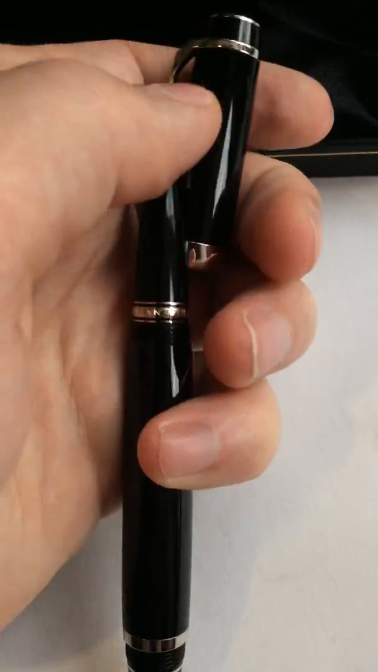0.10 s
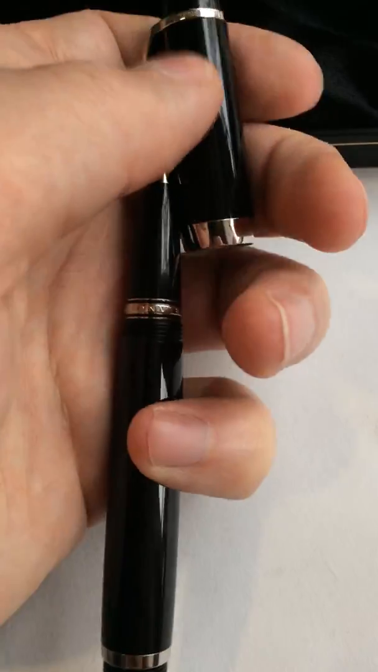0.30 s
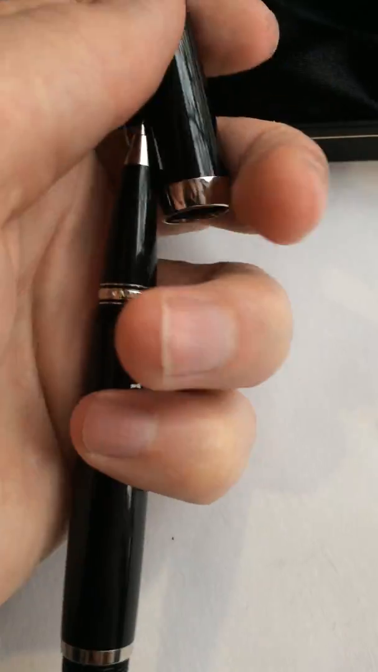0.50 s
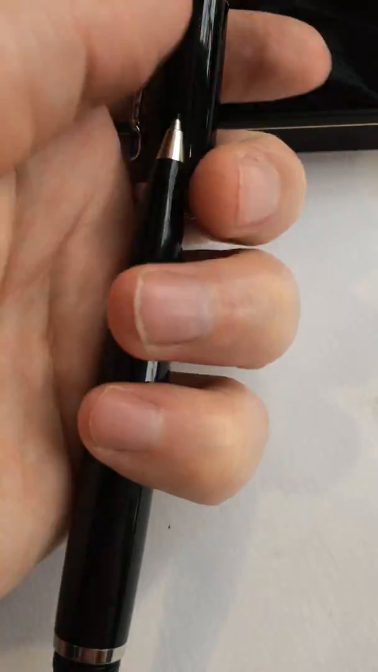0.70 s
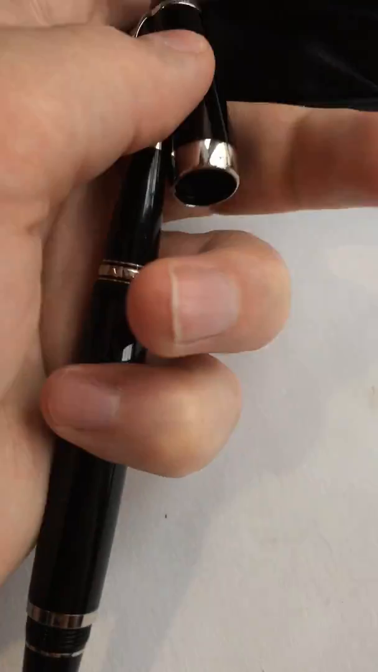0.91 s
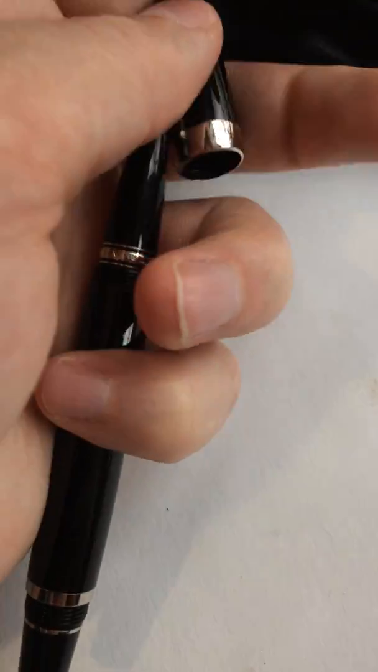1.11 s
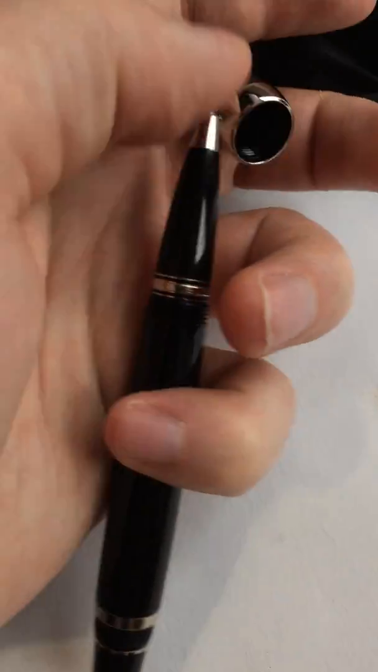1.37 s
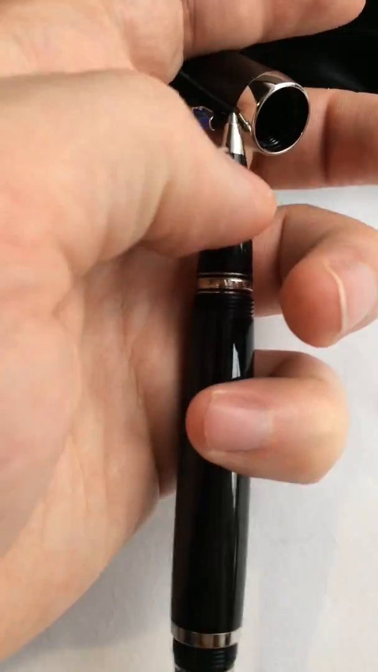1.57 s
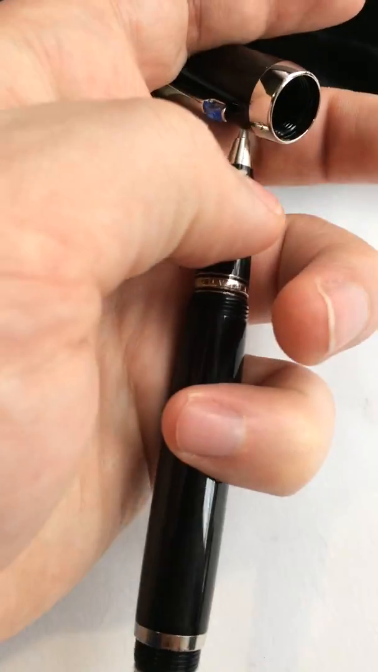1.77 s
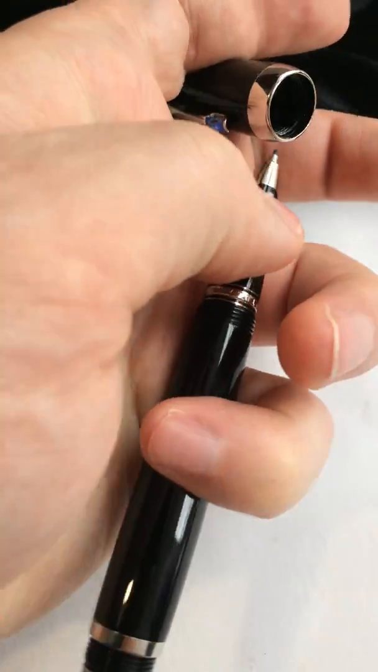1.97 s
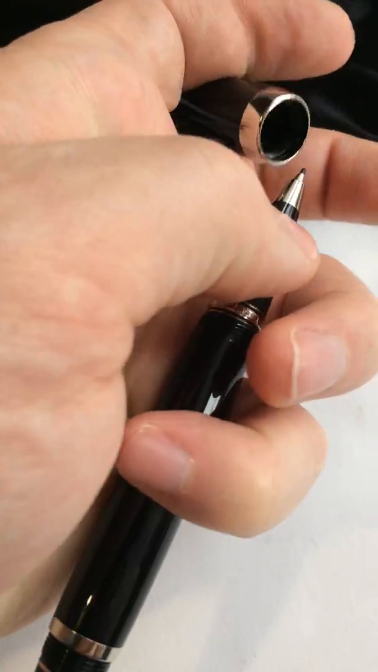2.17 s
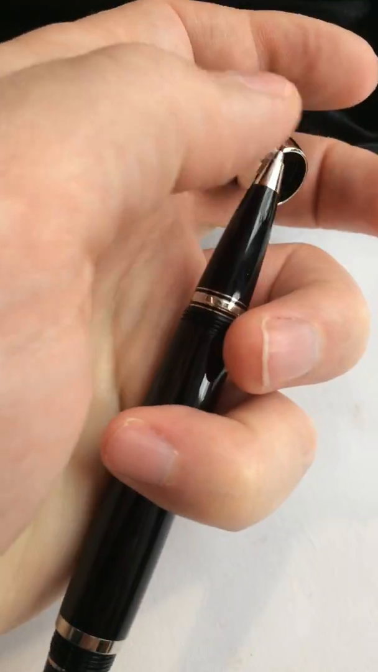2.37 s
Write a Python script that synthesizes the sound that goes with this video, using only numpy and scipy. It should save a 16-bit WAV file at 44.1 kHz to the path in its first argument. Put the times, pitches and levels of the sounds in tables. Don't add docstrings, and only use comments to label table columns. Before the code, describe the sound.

Hard little pen parts click together in hands, one sharp rattle then sparse ticks over faint hum

```python
import sys
import numpy as np
from scipy import signal
from scipy.fft import rfft, irfft
from scipy.io import wavfile

SR = 44100
rng = np.random.default_rng(int(sys.argv[2]) if len(sys.argv) > 2 else 0)


def to_wav(sig):
    pcm = np.clip(np.atleast_2d(sig), -1, 1) * 32767
    pcm = np.round(pcm).astype(np.int16)
    wavfile.write(sys.argv[1], SR, pcm.T)


def invert_db(level):
    return 10 ** (np.asarray(level, dtype=float) / 20)


N = 110250


def delayed(x, late_s):
    return np.roll(x, int(round(late_s * SR)))


def rms_one(x):
    return x / np.sqrt(np.mean(x ** 2) + 1e-30)


def filtered(x, order, edge_hz, kind):
    return signal.sosfilt(signal.butter(order, edge_hz, kind, fs=SR, output="sos"), x)


def ring(clicks, pitch_hz, t60_s):
    decay = invert_db(-60 / (t60_s * SR))
    turn = 2 * np.pi * pitch_hz / SR
    return signal.lfilter([0, np.sin(turn)], [1, -2 * decay * np.cos(turn), decay * decay], clicks + 1e-18)


# (softer contacts narrow around 4 kHz, losing dB per octave away from 4 kHz per dB softer)
HOLDS = [
    (.00053, -4.5, -13, .3),
    (.00056, -1, -14, 0),
    (.00055, -5, -16, 0),
    (.0005, -6, -11, 0),
    (.00048, -2, -21, 0),
]


def strikes(hits, modes, hold):
    start_s, level_db, tilt_db = np.transpose(hits)
    palm_delay_s, palm_level_db, crack_level_db, softening = HOLDS[hold]
    at = (start_s * SR).astype(int)
    softer_db = level_db.max() - level_db
    out = np.zeros(N)

    for k, (pitch_hz, mode_db, t60_s) in enumerate(modes):
        octaves = np.log2(pitch_hz / 4000)
        click_db = level_db + mode_db - 8 + tilt_db * octaves - softening * softer_db * abs(octaves)
        clicks = np.zeros(N)
        clicks[at] = invert_db(click_db) * (-1) ** k
        out += ring(clicks, pitch_hz, min(t60_s, 105 / pitch_hz))

    t = np.arange(600) / SR
    crack_t60_s = .005
    cracks = rng.standard_normal((len(at), len(t)))
    crack_db = level_db + crack_level_db - softening * softer_db
    for i, db, crack in zip(at, crack_db, cracks):
        out[i:i + len(t)] += invert_db(db - 60 * t / crack_t60_s) * crack
    return out + invert_db(palm_level_db) * delayed(out, palm_delay_s)


# start_s, level_db, tilt_db_per_octave
CHATTER = [
    (.2002, -15, 0),
    (.2084, -21.5, -.5),
    (.2126, -28.5, 1),
    (.2154, -29, -1),
    (.2176, -31, -1),
    (.2197, -36, -1),
    (.2215, -39, -2),
    (.2322, -54, -3),
]
# pitch_hz, level_db, t60_s
CAP_MODES = [(1740, -13, .011), (2392, -20, 0.053), (3320, -4, 0.02206), (4040, 5, 0.0068),
             (4700, 1.5, 0.0083), (5380, -1.5, 0.0047), (6640, -1, 0.014), (7350, -12, .008),
             (7790, -4.5, .016), (8700, -9.5, 0.012), (9740, 1.5, 0.0072), (10664, 4.5, .009),
             (13220, -7, .006), (15000, -11.5, .004)]


def cap_chatter():
    return strikes(CHATTER, CAP_MODES, 0)


# start_s, level_db, tilt_db_per_octave
BAND_TAPS = [
    (.3422, -29, 0),
    (.3446, -42, -4),
]
# pitch_hz, level_db, t60_s
BAND_MODES = [(1430, -20, 0.0099), (1952, -15, 0.029), (2440, -8, 0.015), (2970, -4.5, 0.0066),
              (3610, -8, 0.015), (4700, -2.5, 0.011), (6000, -2, 0.016), (6500, -5.5, 0.012),
              (7770, 7, 0.022), (8140, 9.5, 0.0078), (9300, 9.5, 0.0037), (11500, 2.5, 0.0031),
              (11900, -4, 0.0073), (14340, -8, 0.0065)]


def band_taps():
    return strikes(BAND_TAPS, BAND_MODES, 1)


# start_s, level_db, tilt_db_per_octave
MOUTH_KNOCKS = [
    (.7614, -56.5, -3),
    (1.6725, -35, 0.6),
    (1.6770, -38.5, 1),
    (1.6813, -48, 0),
    (1.8498, -70, 7),
]
# pitch_hz, level_db, t60_s
MOUTH_MODES = [(1310, -26, 0.01), (1680, -1.5, 0.024), (2570, -11.5, 0.0076), (3195, 1.5, 0.03),
               (4074, 0.5, 0.0093), (6500, -24, 0.014), (7480, 6, 0.02), (7840, 4.5, 0.0043),
               (9750, -13, 0.0091), (10850, -5, 0.01), (11500, 5, 0.0049), (14650, -10, 0.013)]


def mouth_knocks():
    return strikes(MOUTH_KNOCKS, MOUTH_MODES, 4)


# start_s, level_db, tilt_db_per_octave
TOUCHES = [
    (.2853, -63, 9.5),
    (.4358, -43.5, 3.6),
    (.6696, -65.5, 1),
    (.7464, -61.5, -10.5),
    (.8726, -66, 5),
    (1.1382, -59, -5.0),
    (1.8041, -57.5, -11),
]
# pitch_hz, level_db, t60_s
TOUCH_MODES = [(1400, -25.5, .008), (2730, 1, 0.014), (3330, -5.5, 0.027), (4000, -2, .014),
               (6940, 2, 0.0033), (7860, 3.5, 0.018), (8480, 2, 0.0088), (9850, -4, 0.0054),
               (13500, -11, 0.006)]


def light_touches():
    return strikes(TOUCHES, TOUCH_MODES, 2)


# start_s, level_db, tilt_db_per_octave
TIP_CLICKS = [
    (.0560, -60, -3),
    (.0629, -60, 0),
    (.0704, -60, -4),
    (.0848, -55.5, 2),
    (1.1220, -49, -2.1),
]
# pitch_hz, level_db, t60_s
TIP_MODES = [(2024, -5, 0.018), (2878, 0, 0.019), (3500, -0.5, 0.024), (4620, 6, 0.0031),
             (5750, 5.5, 0.0054), (7070, 4, 0.0076), (9260, 3.5, .005), (12300, -2.5, 0.0017),
             (15100, 2, 0.0088)]


def tip_clicks():
    return strikes(TIP_CLICKS, TIP_MODES, 3)


# delay_s, level_db
ECHOES = [
    (.0016, -10),
    (.0026, -13),
    (.0045, -22),
]


def knocks():
    direct = cap_chatter() + band_taps() + light_touches() + tip_clicks() + mouth_knocks()
    direct = filtered(direct, 4, 1150, "high")
    return direct + sum(invert_db(level_db) * delayed(direct, delay_s) for delay_s, level_db in ECHOES)


# start_s, length_s, level_db (rms), pitch_hz (centre), width_hz
SLIDES = [(0.045, 0.062, -68, 2900, 800), (0.047, 0.11, -73, 6400, 3500), (.05, 0.12, -76, 10600, 4960),
          (.098, 0.044, -71.5, 2470, 650), (0.722, 0.036, -78, 11000, 6430), (.728, .016, -82.5, 2350, 950),
          (.961, 0.064, -80, 13000, 4000), (0.984, 0.029, -76.5, 7740, 800),
          (1.294, 0.1, -68.5, 1320, 1200), (1.32, 0.076, -65, 2200, 1600),
          (1.311, 0.083, -73.5, 5850, 7540), (1.437, 0.065, -76.5, 12000, 4000),
          (1.794, 0.069, -79.5, 2200, 2410)]


def slides():
    slips_per_s, spread_db = 1800, 4.5
    slipping = rng.random(N) < slips_per_s / SR
    strength = invert_db(spread_db * np.minimum(rng.exponential(1, N), 4))
    slips = slipping * strength * rng.choice([-1, 1], N)
    rub = rms_one(slips) + rng.standard_normal(N)

    out, t = np.zeros(N), np.arange(N) / SR
    for start_s, length_s, level_db, pitch_hz, width_hz in SLIDES:
        progress = np.clip((t - start_s) / length_s, 0, 1)
        swell = np.sin(np.pi * progress).clip(0) ** .5 * (t < start_s + length_s)
        band_hz = [pitch_hz - width_hz / 2, min(pitch_hz + width_hz / 2, .45 * SR)]
        out += invert_db(level_db) * swell * rms_one(filtered(rub, 2, band_hz, "band"))
    return out


def room(x):
    level_db, t60_s = -31, 0.22
    t = np.arange(SR // 2) / SR
    tail = filtered(rng.standard_normal(len(t)), 2, [2500, 9000], "band")
    tail = tail * invert_db(-60 * t / t60_s) * (t > .005)
    return invert_db(level_db) * signal.fftconvolve(x, tail / np.sqrt(np.sum(tail ** 2)))[:N]


def resonance(x, pitch_hz, width_hz):
    r = np.exp(-np.pi * width_hz / SR)
    top = np.array([1, 0, -1]) * (1 - r * r) / 2
    return signal.lfilter(top, [1, -2 * r * np.cos(2 * np.pi * pitch_hz / SR), r * r], x)


# pitch_hz, level_db (rms), width_hz
HUM = [(147, -64.5, 1), (253.9, -72.5, 1.4), (293, -79, 6.2), (397, -84.5, 21), (438.6, -81.5, 8),
       (505, -90.5, 3.0), (670.5, -86, 1.5), (702, -96.5, 3.0), (800, -88.5, 0.59)]


def hum():
    t, out = np.arange(N) / SR, np.zeros(N)
    for pitch_hz, level_db, width_hz in HUM:
        skirt = rms_one(resonance(rng.standard_normal(2 * N), pitch_hz, width_hz)[N:])
        tone = np.sqrt(2) * np.sin(2 * np.pi * (pitch_hz * t + rng.random()))
        steady = 1 / (1 + (width_hz / 6) ** 4)
        out += invert_db(level_db) * (np.sqrt(steady) * tone + np.sqrt(1 - steady) * skirt)
    return out


# pitch_hz, level_db_per_hz
AIR = [(20, -107), (45, -97.5), (95, -92), (200, -89), (330, -102), (700, -104), (3000, -113),
       (12500, -121)]


def air():
    hz = np.fft.rfftfreq(N, 1 / SR)
    pitch_hz, level_db = np.transpose(AIR)
    colour = invert_db(np.interp(np.log(hz + 1), np.log(pitch_hz), level_db)) * (hz > 10)
    colour = colour / np.sqrt(1 + (hz / 14200) ** 8)
    return irfft(rfft(rng.standard_normal(N)) * colour * np.sqrt(SR / 2), N)


def scene():
    pen = knocks()
    return (pen + room(pen) + slides() + hum() + air())[None]


def low_pass(x):
    return signal.sosfilt(signal.butter(12, 17050, fs=SR, output="sos"), x)


def record(dry):
    mix = filtered(dry, 6, 16300, "low")
    mix = signal.sosfilt(signal.cheby2(10, 60, 17200, fs=SR, output="sos"), mix)
    return low_pass(mix)


dry = scene()
out = record(dry)
to_wav(out)
```